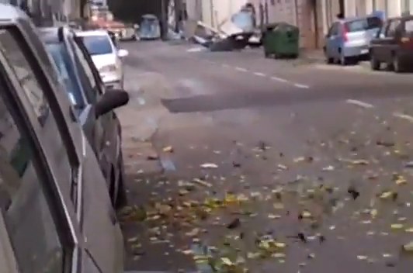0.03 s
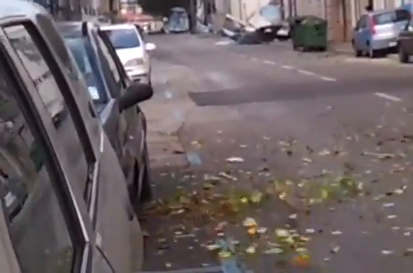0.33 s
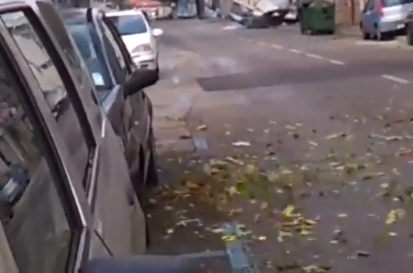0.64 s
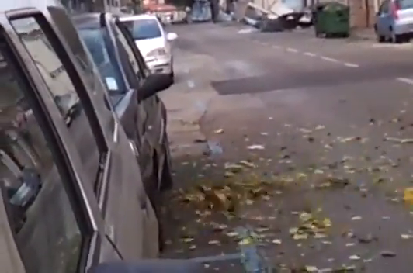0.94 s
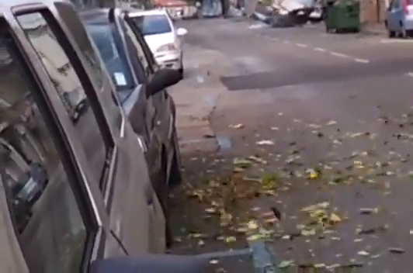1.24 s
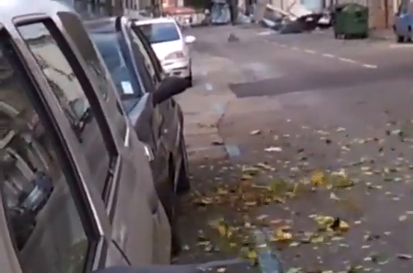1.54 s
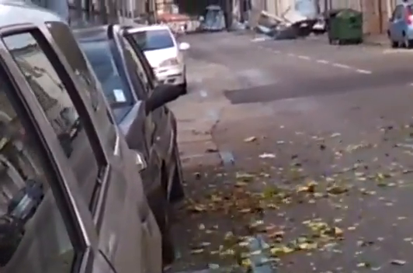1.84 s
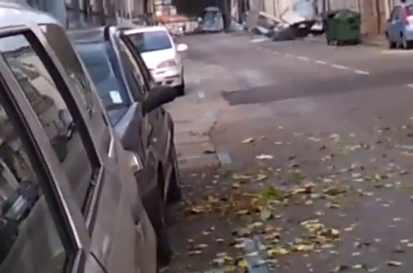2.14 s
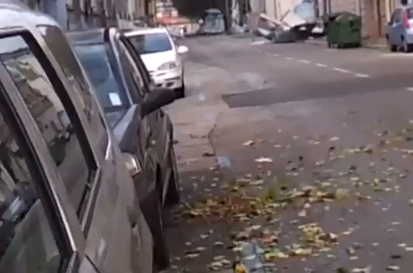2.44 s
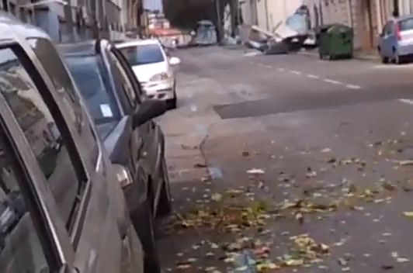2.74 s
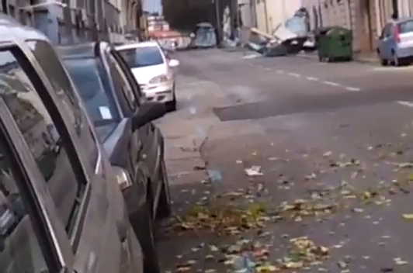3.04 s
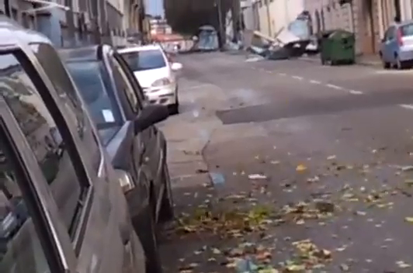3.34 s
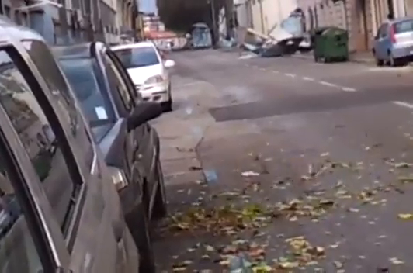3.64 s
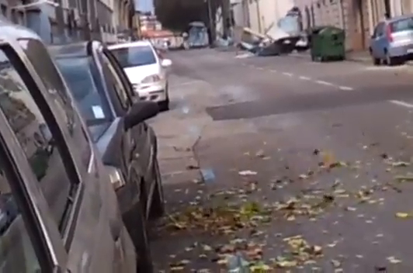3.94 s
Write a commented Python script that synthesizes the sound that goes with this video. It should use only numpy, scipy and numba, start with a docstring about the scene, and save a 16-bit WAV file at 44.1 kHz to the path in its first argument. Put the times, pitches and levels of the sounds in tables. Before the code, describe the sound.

Wind-blown dry leaves rustle and scrape over asphalt, with low wind thumps and distant traffic.

```python
"""A town street of parked cars on a windy day, heard through one mono microphone.
Far off, traffic and wind rumble between the houses and a motor hums. Dry leaves rustle throughout
as countless tiny contacts, slide over the asphalt in short flurries and now and then tick close by.
Gusts buffet the microphone with low flutter and rumble, and a few single eddies thump it."""
import sys
import numpy as np
from scipy import signal
from scipy.fft import rfft, irfft
from scipy.io import wavfile
from scipy.ndimage import uniform_filter1d
from numba import njit

SR = 44100
rng = np.random.default_rng(int(sys.argv[2]) if len(sys.argv) > 2 else 0)


def persist_wave(psi):
    """Save psi, clipped to +-1, as 16-bit WAV."""
    counts = np.round(np.clip(psi, -1, 1) * 32767).astype(np.int16)
    wavfile.write(sys.argv[1], SR, np.atleast_2d(counts).T)


N = 176400


def undb(db):
    """Decibels to gain."""
    return 10 ** (np.asarray(db) / 20)


def unit(x):
    """Scale to rms 1."""
    return x / np.sqrt(np.mean(x ** 2))


def colour(x, points):
    """Filter by (freq_hz, gain_db) points, then scale to rms 1."""
    hz, db = np.array(points).T
    bins_hz = np.maximum(np.fft.rfftfreq(N, 1 / SR), 1)
    gain = undb(np.interp(np.log(bins_hz), np.log(hz), db))
    return unit(irfft(rfft(x) * gain, N))


def noise():
    """White noise."""
    return rng.standard_normal(N)


def walk(rate_hz):
    """Smooth random drift of rms 1 that takes a new course rate_hz times a second."""
    hold = int(SR / rate_hz)
    steps = np.repeat(rng.standard_normal(N // hold + 1), hold)
    return unit(uniform_filter1d(uniform_filter1d(steps, hold), hold)[:N])


def flicker(x, rate_hz, depth_db):
    """Let the level of each frequency band waver on its own."""
    edges_hz = np.geomspace(100, 8000, 12)
    band = np.searchsorted(edges_hz, np.fft.rfftfreq(N, 1 / SR))
    spectrum = rfft(x)
    return sum(irfft(spectrum * (band == k), N) * undb(depth_db * walk(rate_hz))
               for k in range(len(edges_hz) + 1))


@njit
def svf(x, hz, width_hz):
    """State-variable filter with moving centre and width; returns (low-pass, band-pass)."""
    out = np.empty((2, len(x)))
    band_state, low_state = 0., 0.
    for i in range(len(x)):
        g, damping = np.tan(np.pi * hz[i] / SR), width_hz[i] / hz[i]
        band = (band_state + g * (x[i] - low_state)) / (1 + g * (g + damping))
        out[0, i], out[1, i] = low_state + g * band, damping * band
        band_state, low_state = 2 * band - band_state, low_state + 2 * g * band
    return out


def swell(t, peak_s, rise_s, decay_s):
    """Smooth rise to 1 at peak_s, then exponential decay."""
    return np.exp(-(np.minimum(t - peak_s, 0) / rise_s) ** 2 - np.maximum(t - peak_s, 0) / decay_s)


def town(t):
    """Far traffic and wind between the houses: a rumble that gently swells and eases."""
    # spectrum of the distant town and wind: freq_hz, gain_db
    spectrum = [(20, -6.5), (40, -11), (62, -2.5), (100, -4.5), (165, -2.5), (215, -6), (320, -5.5),
                (430, -9), (660, -13), (880, -14.5), (1500, -19.5), (2500, -25), (7000, -43.5)]
    # its loudness over time: time_s, level_db
    levels = [(0, -35), (.7, -36.5), (1.5, -36), (1.9, -36), (2.25, -36.5), (2.5, -35), (3.0, -36),
              (3.2, -36), (4, -36)]
    level_db = np.interp(t, *np.array(levels).T) + 0.6 * walk(5.46)
    return undb(level_db) * colour(flicker(noise(), rate_hz=12, depth_db=1.0), spectrum)


def motor():
    """A distant motor hums in three low harmonics that waver in pitch and level."""
    # harmonics of the hum: multiple, level_db
    harmonics = [(2, -43), (3, -49), (4, -53)]
    fundamental_hz, wander, waver_db = 44.85, 0.014, 2.5
    phase = 2 * np.pi * np.cumsum(fundamental_hz * (1 + wander * walk(4.99))) / SR
    return sum(undb(db + waver_db * walk(6.08)) * unit(np.sin(k * phase)) for k, db in harmonics)


def crackle():
    """Countless tiny leaf contacts: the near ones distinct, the far ones merged into hiss."""
    contacts_per_s, spread_db = 3000, 2
    size = undb(spread_db * np.minimum(rng.exponential(size=N), 6))
    contacts = (rng.random(N) < contacts_per_s / SR) * size * np.sign(noise())
    near = undb(-4.5) * unit(contacts)
    far = undb(-2.5) * noise()
    return flicker(near + far, rate_hz=35.13, depth_db=0.3)


def scratches():
    """Single dry leaves ring briefly, each at its own pitch."""
    scratches_per_s, spread_db, decay_s = 130, 2, 0.013
    low_hz, high_hz = 3714, 6900
    age = np.arange(4096) / SR
    out = np.zeros(N + len(age))
    for when, pitch, size in rng.random((int(scratches_per_s * N / SR), 3)):
        hz = low_hz + pitch * (high_hz - low_hz)
        gain = undb(spread_db * min(-np.log(1 - size), 3))
        start = int(when * N)
        out[start:start + len(age)] += gain * np.exp(-age / decay_s) * np.sin(2 * np.pi * hz * age)
    return unit(out[:N])


def leaves(t):
    """Wind-driven leaves rustle without pause, and in flurries scrape and hiss over the asphalt."""
    # loudness of the bed of leaves: time_s, level_db
    bed_levels = [(0, -42.5), (.25, -43), (.7, -43.5), (.92, -43.5), (1.15, -44.5), (1.4, -43),
                  (1.64, -45.5), (1.75, -43.5), (1.95, -44.5), (2.1, -48), (2.28, -44), (2.65, -43),
                  (2.87, -46), (3.25, -46.5), (3.55, -45.5), (3.85, -46), (4, -44.5)]
    # spectrum of rustling leaves: freq_hz, gain_db
    rustle_spectrum = [(500, -15), (1300, -7.5), (2200, -7), (3200, -1), (4500, -0.5), (5200, 1.5),
                       (5800, 2), (6400, 0.7), (7200, -3.5), (8000, -11.5)]
    # leaves sliding over the asphalt: peak_s, rise_s, decay_s, scrape_db, hiss_db
    flurries = [(.04, .06, 0.064, -35.5, -41), (.12, 0.054, 0.19, -41, -52), (.94, 0.038, 0.099, -40, -55),
                (1.72, .06, 0.088, -44, -57.5), (2.335, .009, 0.059, -40, -37.5),
                (2.40, 0.029, .1, -39.5, -47.5), (2.525, .02, 0.16, -38, -56),
                (3.38, 0.064, .05, -45.5, -65), (3.51, .016, .026, -54, -47),
                (3.665, 0.049, 0.075, -43, -41.5), (3.76, 0.085, .2, -47, -63)]
    # spectrum of their scrape: freq_hz, gain_db
    scrape_spectrum = [(200, -3), (500, 3), (1000, 3.5), (1700, 1.5), (2800, -4.5), (4500, -9.5),
                       (8000, -27.5)]
    rustle_power = undb(np.interp(t, *np.array(bed_levels).T)) ** 2
    scrape_power = np.zeros(N)
    for peak_s, rise_s, decay_s, scrape_db, hiss_db in flurries:
        slide = swell(t, peak_s, rise_s, decay_s)
        scrape_power += (undb(scrape_db) * slide) ** 2
        rustle_power += (undb(hiss_db) * slide) ** 2
    rustle = unit(colour(crackle(), rustle_spectrum) + undb(-9) * scratches())
    rustle *= undb(.5 * walk(30.1))
    scrape = colour(crackle(), scrape_spectrum)
    return np.sqrt(rustle_power) * rustle + np.sqrt(scrape_power) * scrape


def ticks(t):
    """Dry leaves and stalks strike close to the microphone and ring very briefly."""
    # single strikes: peak_s, level_db, pitch_hz, width_hz, decay_s
    strikes = [(.043, -36.5, 2600, 2600, .012), (.043, -35, 5200, 3500, .0058),
               (.557, -38.5, 4390, 200, .012), (1.375, -44, 5300, 2200, .012),
               (2.331, -38.5, 6200, 2600, .05), (2.345, -40.5, 5050, 400, .04),
               (2.507, -41, 4330, 1600, .016), (2.998, -27.5, 5500, 6000, .0013),
               (3.657, -42.5, 5100, 400, 0.022)]
    out = np.zeros(N)
    for peak_s, level_db, pitch_hz, width_hz, decay_s in strikes:
        band = np.full(N, float(pitch_hz)), np.full(N, float(width_hz))
        _, ring = svf(noise(), *band)
        _, ring = svf(ring, *band)
        out += undb(level_db) * swell(t, peak_s, rise_s=.0005, decay_s=decay_s) * unit(ring)
    return out


def buffeting(t):
    """Turbulence at the microphone port: stronger gusts flutter faster, amid a slow rumble."""
    # gusts on the microphone: peak_s, half_length_s, flutter_db, rumble_db
    gusts = [(0.101, 0.013, -30, -34.5), (.224, 0.0087, -29.5, -40), (0.293, .016, -43, -35),
             (0.335, 0.0063, -31.5, -49), (0.427, 0.014, -39, -42), (1.095, .02, -36.5, -35.5),
             (1.143, .01, -25.5, -24), (1.165, .009, -24.5, -26), (1.203, .02, -19, -36),
             (1.235, .007, -30, -29), (1.273, 0.012, -29.5, -29.5), (1.31, 0.037, -39.5, -36),
             (1.848, 0.0069, -26.5, -40), (1.873, .011, -30, -28.5), (1.937, 0.021, -30.5, -41),
             (2.001, 0.025, -28, -39.5), (2.075, .0094, -31, -37), (2.606, 0.015, -32, -32),
             (2.658, 0.018, -33.5, -36), (2.679, 0.01, -25.5, -30), (2.776, 0.02, -33.5, -38),
             (2.91, .01, -38, -37), (2.949, 0.016, -33, -37), (3.605, 0.024, -38, -37),
             (3.995, 0.0065, -26.5, -30)]
    # spectrum of the slow pressure rumble: freq_hz, gain_db
    rumble_spectrum = [(15, -20), (35, -1.5), (58, -2), (90, -4), (180, -21.5), (600, -54)]
    reference_hz, reference_db, octaves_per_db = 293.6, -23.5, 0.1
    rumble_stretch = 1.26  # a gust's rumble lasts this many times as long as its flutter
    flutter_power, rumble_power = np.full(N, 1e-8), np.zeros(N)
    for peak_s, half_s, flutter_db, rumble_db in gusts:
        offset = (t - peak_s) / half_s
        flutter_power += undb(flutter_db) ** 2 * np.exp(-offset ** 2)
        rumble_power += undb(rumble_db) ** 2 * np.exp(-(offset / rumble_stretch) ** 2)
    excess_db = np.maximum(10 * np.log10(flutter_power) - reference_db, -3)
    flutter_hz = reference_hz * 2 ** (octaves_per_db * excess_db)
    top_hz = 2.3 * flutter_hz  # the flutter falls off steeply above this
    air = signal.sosfilt(signal.butter(2, 79, "high", fs=SR, output="sos"), noise())
    flutter, _ = svf(air, flutter_hz, 1.12 * flutter_hz)
    flutter, _ = svf(flutter, top_hz, np.sqrt(2) * top_hz)
    flutter /= np.sqrt(uniform_filter1d(flutter ** 2, size=900))  # even out, so the gusts set the level
    rumble = colour(noise(), rumble_spectrum)
    return np.sqrt(flutter_power) * flutter + np.sqrt(rumble_power) * rumble


def thumps(t):
    """Each eddy sucks at the microphone port, then pushes."""
    # single eddies hitting the port: centre_s, half_length_s, peak_db
    eddies = [(.226, 0.0011, -22.5), (.339, 0.0011, -25.5), (1.1615, 0.0015, -19), (1.1997, 0.00021, -19.5),
              (1.8667, 0.0013, -14), (2.6738, 0.0016, -13)]
    out = np.zeros(N)
    for centre_s, half_s, peak_db in eddies:
        offset = (t - centre_s) / half_s
        out += undb(peak_db) * offset * np.exp(.5 - .5 * offset ** 2)
    return out


def scene():
    """Street, leaves and wind at one microphone, the same on both channels."""
    t = np.arange(N) / SR
    mono = town(t) + motor() + leaves(t) + ticks(t) + buffeting(t) + thumps(t)
    return np.array([mono, mono])


def record(dry):
    """The microphone rounds the strongest gusts; the recorder rolls off and cuts the top."""
    overload, roll_off_hz, top_hz = 0.57, 7080, 8000
    rounded = overload * np.tanh(dry / overload)
    dulled = signal.sosfilt(signal.butter(14, roll_off_hz, fs=SR, output="sos"), rounded)
    return signal.sosfilt(signal.ellip(8, .2, 70, top_hz, fs=SR, output="sos"), dulled)


dry = scene()
out = record(dry)
persist_wave(out)
```